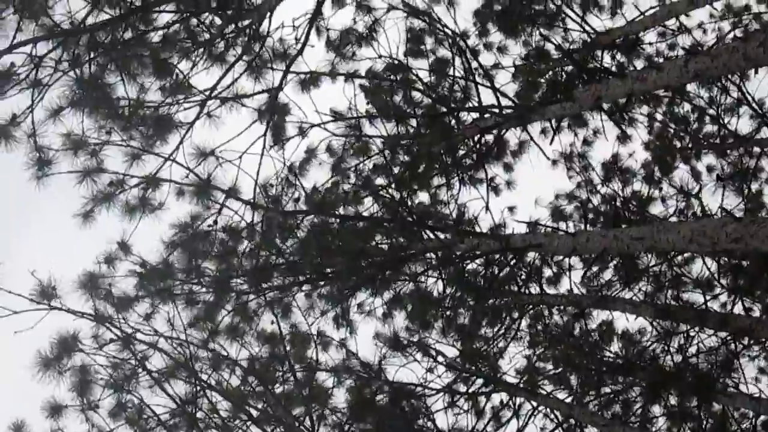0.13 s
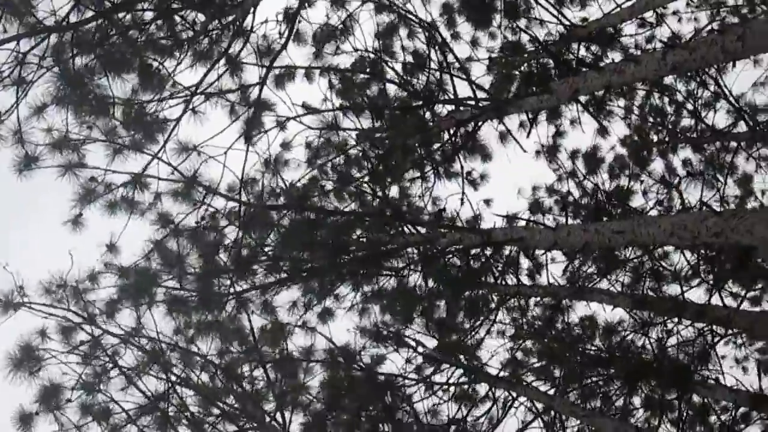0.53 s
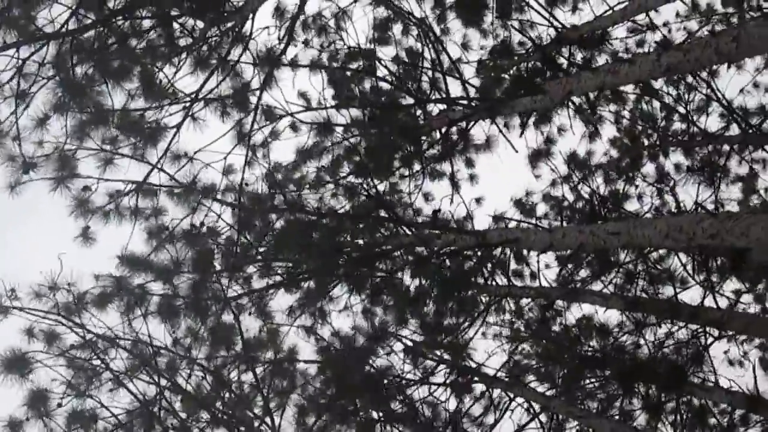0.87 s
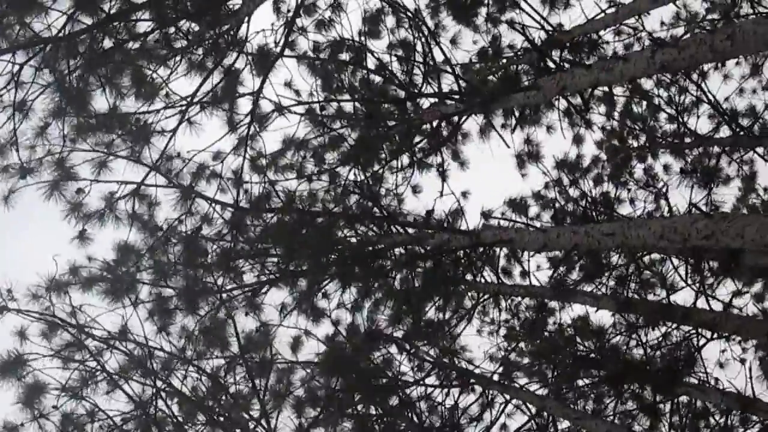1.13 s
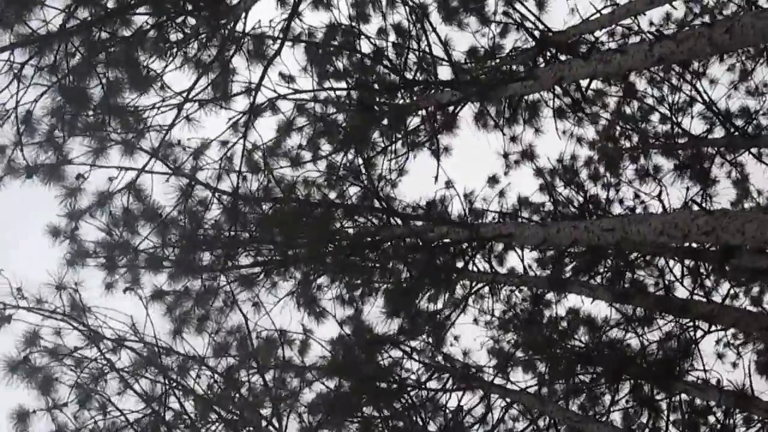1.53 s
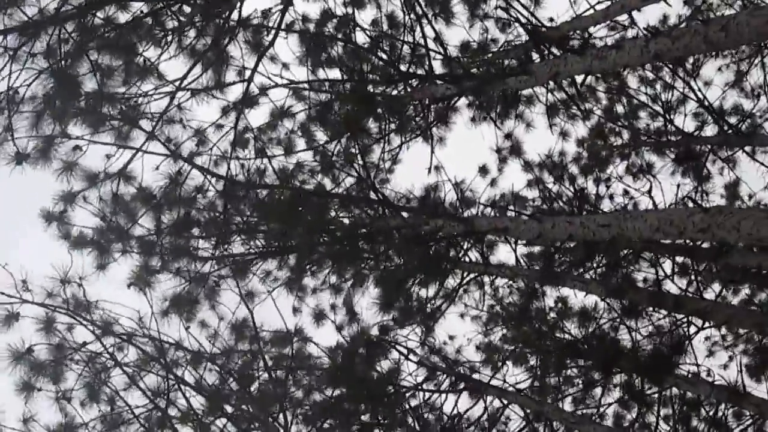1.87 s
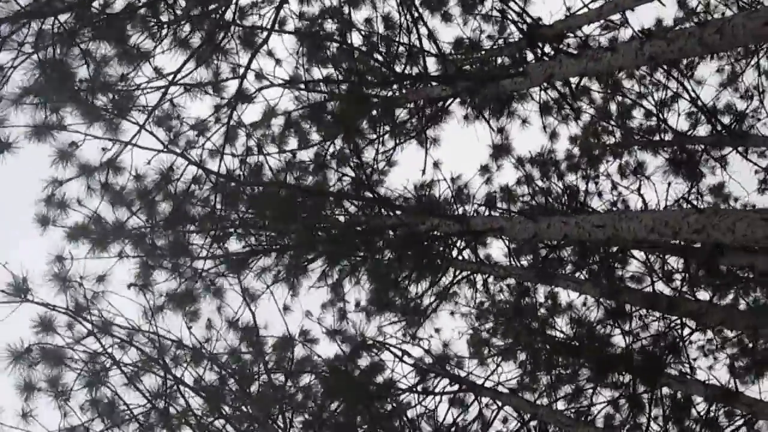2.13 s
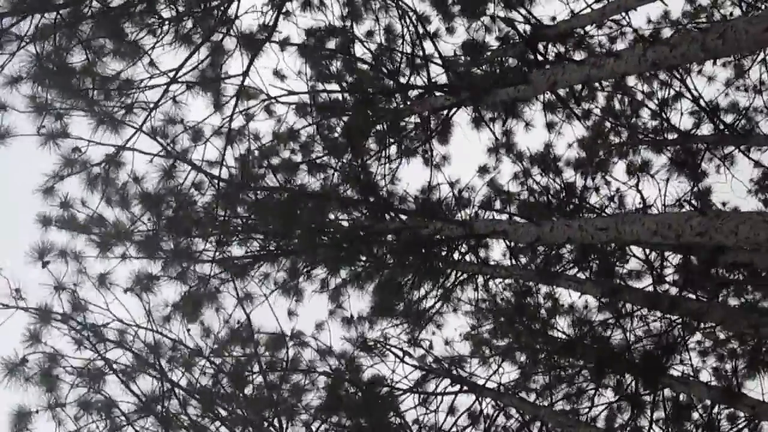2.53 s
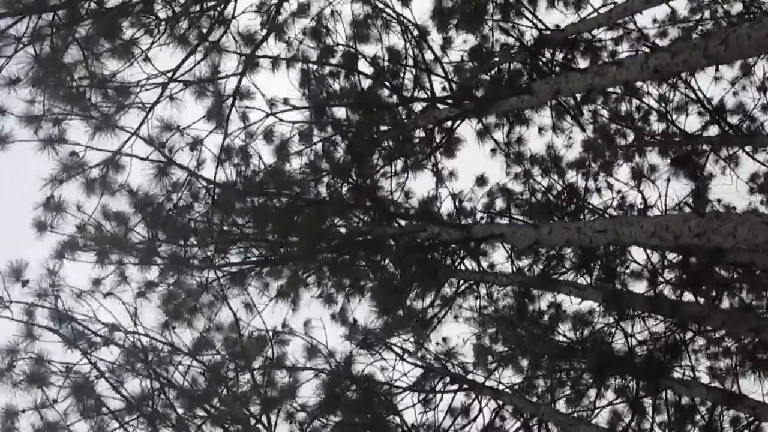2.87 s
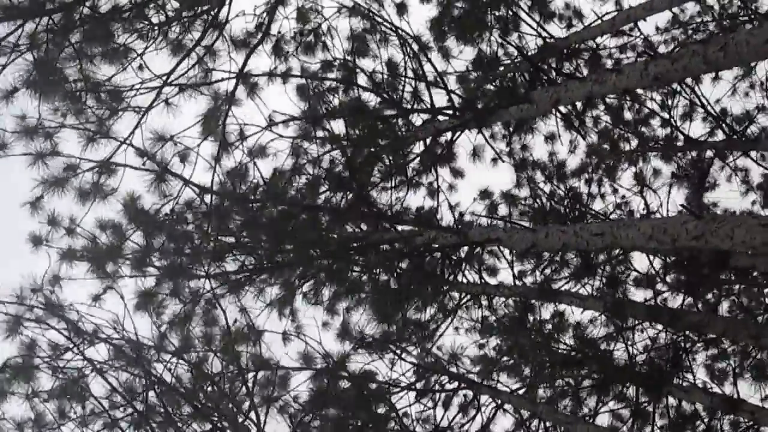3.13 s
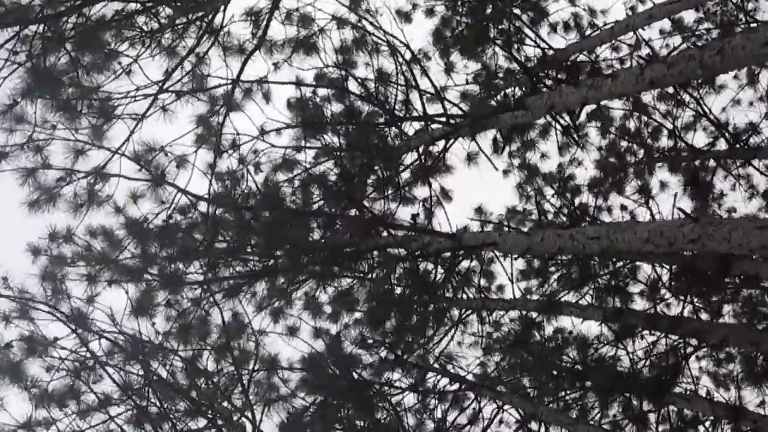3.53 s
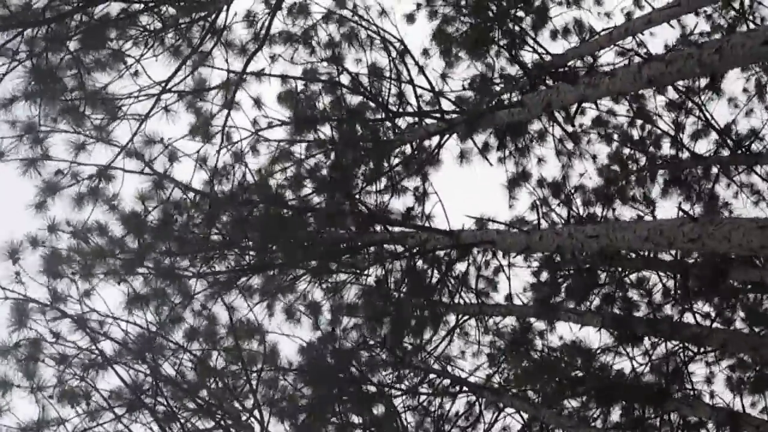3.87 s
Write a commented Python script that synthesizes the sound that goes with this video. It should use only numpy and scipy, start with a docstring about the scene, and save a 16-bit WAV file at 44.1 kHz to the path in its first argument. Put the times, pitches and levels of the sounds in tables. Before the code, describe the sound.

Outdoor wind rushes through pine crowns, broad and nearly constant, heard from below on a handheld microphone; a short scratchy rub opens it, faint low buffeting lies beneath, and crisp twig ticks cluster near the end.

```python
"""Wind in pine crowns

Wind rushes through tall pines: noise in gently flickering bands gives a broad roar around 600-1000 Hz
with needle hiss above. A low hum wavers as three wandering tones and low noise buffets the microphone.
Twigs tick as short cracks of noise. A hand-held recorder switches on, a finger rubs its case
(dense random slips through resonances), and the sound fades in over the first second."""
import sys
import numpy as np
from scipy import signal
from scipy.fft import rfft, irfft
from scipy.io import wavfile

SR = 44100
rng = np.random.default_rng(int(sys.argv[2]) if len(sys.argv) > 2 else 0)


def to_wav(s):
    """Save 16-bit WAV."""
    ch = np.atleast_2d(s).T  # columns
    pcm = np.round(np.clip(ch, -1, 1) * 32767)  # PCM
    wavfile.write(sys.argv[1], SR, pcm.astype(np.int16))


N = 176400  # 4 s
OPPOSED = np.array([[1], [-1]])  # equal and opposite in the two channels


def amp(db):
    """Decibels to linear gain."""
    return 10 ** (np.asarray(db) / 20)


def rms_one(x):
    """Scale to an RMS of 1."""
    return x / np.sqrt(np.mean(x ** 2) + 1e-20)


def in_time(rows):
    """Draw each column after the first as a curve over time."""
    s, *columns = np.transpose(rows)
    t = np.arange(N) / SR
    return [np.interp(t, s, column) for column in columns]


def drift(rate):
    """Slow chance at about rate per second, spread 1: noise through a two-pole low-pass."""
    step = 40  # samples between slow values
    pole = np.exp(-2 * step * np.pi * rate / SR)
    noise = rng.standard_normal(N // step + 2002)
    slow = signal.lfilter([1], [1, -2 * pole, pole * pole], noise)[2000:]  # drop the settling
    return np.interp(np.arange(N) / step, np.arange(len(slow)), rms_one(slow))


def coloured(points):
    """Spectrum of white noise shaped by a colour curve, drawn straight over log frequency."""
    hz, db = np.transpose(points)
    log_f = np.log(np.arange(N // 2 + 1) * SR / N + 1)
    return rfft(rng.standard_normal(N)) * amp(np.interp(log_f, np.log(hz), db))


def band(x, low_hz, high_hz):
    """Steep band-pass, scaled to a peak height of 1."""
    sos = signal.butter(3, [low_hz, high_hz], "band", fs=SR, output="sos")
    y = signal.sosfilt(sos, x)
    return y / abs(y).max()


def resonance(x, hz, width):
    """Two-pole resonance with a gain of 1 at its peak."""
    r = np.exp(-np.pi * width / SR)
    feedback = [1, -2 * r * np.cos(2 * np.pi * hz / SR), r * r]
    return signal.lfilter([(1 - r * r) / 2, 0, (r * r - 1) / 2], feedback, x + 1e-18)


# colour of the recorder's own hiss: f/Hz, level/dB (per Hz, relative)
ELECTRONICS_COLOUR = [(2500, -40), (4000, -19), (5000, -7), (8000, -1), (12000, 1), (14500, 2), (15500, -3)]
ELECTRONICS_DB = -64.5


def electronics_hiss():
    """Steady electronic noise, independent in each channel."""
    channels = [rms_one(irfft(coloured(ELECTRONICS_COLOUR), N)) for _ in range(2)]
    return amp(ELECTRONICS_DB) * np.array(channels)


# lumps of wind on the microphone port: t/s, level/dB
BUFFET_LEVELS = [(.11, -76), (.99, -58), (1.07, -60), (1.12, -40), (1.3, -50), (1.45, -58), (1.5, -46),
                 (1.75, -49), (2.07, -61), (2.61, -55), (3.22, -60), (3.42, -56), (3.98, -58)]


def buffet():
    """Wind pressure on the microphone port: noise from 18 to 70 Hz that comes in lumps."""
    sos = signal.butter(3, [18, 70], "band", fs=SR, output="sos")
    rumble = signal.sosfilt(sos, rng.standard_normal(N + SR))[SR:]  # drop the settling
    level_db, = in_time(BUFFET_LEVELS)
    return amp(level_db) * rms_one(rumble)


# wavering hum: t/s, low tone level/dB, middle tone level/dB, high tone level/dB
HUM_LEVELS = [(0.11, -73, -64.5, -72), (0.77, -58, -54, -52), (0.9, -49, -68, -59), (1.08, -54, -40.5, -54),
              (1.34, -45, -46, -55), (1.51, -43, -41, -40), (1.59, -39, -53, -59), (1.7, -37.5, -40, -47),
              (2.21, -47, -59, -53.5), (2.3, -40, -58, -66), (2.34, -39, -50, -50), (2.73, -52, -62, -54),
              (3.05, -48, -45, -47), (3.15, -57, -57, -47), (3.88, -45, -42.5, -52), (3.98, -47, -54, -43)]
# the three tones, low to high: f/Hz, spread of the pitch wander/Hz
HUM_PITCHES = [(102, 1.02), (121, 1.4), (133, 1.7)]
HUM_OCTAVE_DB = -11  # relative to the low tone


def hum():
    """Three sine tones whose pitch and level wander; the lowest has a faint octave."""
    phases = [2 * np.pi * np.cumsum(hz + wander * drift(4)) / SR for hz, wander in HUM_PITCHES]
    levels = amp(in_time(HUM_LEVELS))
    tones = np.sum(levels * np.sin(phases), axis=0)
    octave = levels[0] * amp(HUM_OCTAVE_DB) * np.sin(2 * phases[0])
    return np.sqrt(2) * (tones + octave)  # table levels are RMS


# resonances of the recorder case: f/Hz, width/Hz, level/dB (relative)
CASE_RESONANCES = [(2300, 710, 6), (3180, 670, -2), (4320, 830, -1), (8000, 1100, -20)]
RUB_START_S, RUB_PEAK_S, RUB_END_S = 0.054, 0.084, 0.096
RUB_DB, RUB_RISE_DB, RUB_SLIPS_PER_S = -35.5, 14, 5000


def rub():
    """Finger on the case: dense slips of random strength grow to a peak and excite its resonances."""
    strength = amp(4 * np.minimum(rng.exponential(1, N), 3))
    slips = (rng.random(N) < RUB_SLIPS_PER_S / SR) * rng.standard_normal(N) * strength
    body = 0
    for k, (hz, width, db) in enumerate(CASE_RESONANCES):
        ring = resonance(resonance(slips, hz, width), hz, width)  # twice for steeper sides
        body = body + amp(db) * (-1) ** k * ring  # alternate polarity
    stroke_db, = in_time([(RUB_START_S - .02, -30), (RUB_START_S, -RUB_RISE_DB), (RUB_PEAK_S, 0),
                          (RUB_END_S, -12), (RUB_END_S + .01, -90)])
    return amp(RUB_DB + stroke_db) * rms_one(body)


# twig ticks: t/s, level/dB, body f/Hz, bright part level/dB (relative to the body),
# scattered tail level/dB (relative to the crack)
TWIG_TICKS = [(.320, -43, 8000, -30, -25), (.742, -40, 7000, -12, -20), (.881, -19.5, 6000, -28, -22),
              (1.567, -36, 7500, -13, -25), (1.626, -30, 7400, -8, -30), (1.841, -21.5, 6450, -20, -20),
              (2.2985, -39, 7800, -20.5, -25), (2.476, -27, 6500, -18, -20), (2.479, -23, 6850, -20, -18),
              (3.271, -44, 9000, -4, -20), (3.303, -42, 9000, -3, -18), (3.604, -40, 7800, -13, -25),
              (3.73, -22, 3500, -29, -16), (3.735, -17, 5000, -31, -11), (3.738, -31, 8000, -16, -16),
              (3.761, -22, 4800, -27, -16), (3.782, -19.5, 6100, -13.5, -13)]
CRACK_T60_S, TAIL_T60_S, TICK_WIDE_DB = 0.007, 0.21, -22
TICK_LENGTH = 4410  # samples, 0.1 s
BODY_OCTAVES = 0.24  # each side of the body frequency
BRIGHT_HZ = (9100, 11800)
FAINT_TICKS_PER_S, FAINT_TICK_DB = 10, -22  # level relative to the roar


def ticks(roar_db):
    """Twigs crack as decaying noise with a body, a bright part and a tail; fainter ones come at random."""
    out = np.zeros((2, N + TICK_LENGTH))
    t = np.arange(TICK_LENGTH) / SR
    crack = amp(-60 * t / CRACK_T60_S)
    for s, db, hz, bright_db, tail_db in TWIG_TICKS:
        tail = amp(tail_db - 60 * t / TAIL_T60_S)
        noise = (crack + tail) * rng.standard_normal((2, len(t)))
        body = band(noise, hz / 2 ** BODY_OCTAVES, hz * 2 ** BODY_OCTAVES)
        mid, side = body + amp(bright_db) * band(noise, *BRIGHT_HZ)
        start = int(s * SR)
        out[:, start:start + len(t)] += amp(db) * (mid + amp(TICK_WIDE_DB) * side * OPPOSED)
    strength = amp(3 * np.minimum(rng.exponential(1, N), 3))
    born = (rng.random(N) < FAINT_TICKS_PER_S / SR) * strength
    faint = signal.fftconvolve(born, crack)[:N] * rng.standard_normal(N) + 1e-18
    return out[:, :N] + amp(roar_db + FAINT_TICK_DB) * band(faint, 6000, 11000)


# colour of the stereo spread: f/Hz, level/dB (per Hz, relative)
SPREAD_COLOUR = [(2800, -60), (3500, -30), (4300, -5), (5000, -2), (6200, -4), (7500, -16), (9000, -22),
                 (12000, -44)]
SPREAD_DB = -29.5  # relative to roar and needle hiss together


def stereo_spread(roar_db, hiss_db):
    """The part of the wind that differs between the two ports: treble noise of opposite sign."""
    noise = rms_one(irfft(coloured(SPREAD_COLOUR), N))
    return amp(roar_db + hiss_db + SPREAD_DB) * noise * OPPOSED


# colour of the wind in the crowns: f/Hz, level/dB (per Hz, relative)
CROWN_COLOUR = [(12, -45), (20, -25), (60, -9.5), (106, -10), (171, -9.5), (282, -9), (427, -8),
                (520, -4.5), (631, -1), (834, -1.5), (1040, -0.5), (1300, -4), (1720, -7.5), (2500, -10.5),
                (4000, -12.5), (5500, -13), (6200, -17.5), (7500, -28.5), (9000, -35), (11000, -44.5),
                (13000, -62), (15500, -75)]
NEEDLE_HISS_HZ = 3100  # middle of the one-octave passage from roar to hiss
GUST_DB, PATCH_DB, FLICKER_DB = 0.02, -0.15, 0.5  # spread: all bands, neighbouring bands, single band


def crowns(roar_db, hiss_db):
    """Wind in the crowns: noise in overlapping bands that waver slightly together, in patches and alone."""
    noise = coloured(CROWN_COLOUR)
    octave = np.log2(np.arange(N // 2 + 1) * SR / N + 1)
    out, gust, patch = 0, drift(1.5), drift(3)
    for centre in np.arange(4, 14.6, .5):  # log2 of Hz, half an octave apart
        window = np.clip(1 - 2 * abs(octave - centre), 0, 1)
        layer = irfft(noise * window, N)
        patch = np.sqrt(.5) * (patch + drift(3))  # shared in part with the band below
        hiss_share = np.clip(centre - np.log2(NEEDLE_HISS_HZ) + .5, 0, 1)
        waver_db = GUST_DB * gust + PATCH_DB * patch + FLICKER_DB * drift(20.5)
        out = out + layer * amp(hiss_share * hiss_db + waver_db)
    return amp(roar_db) * out / np.std(irfft(noise, N))


# fade-in, then gusts: t/s, roar level/dB, needle hiss level/dB (relative to the roar)
WIND_LEVELS = [(.11, -46, 0.5), (.25, -41, 0.5), (.4, -36, 0), (.55, -32, 0.5), (.7, -29, -1),
               (.87, -27, -1.5), (1.1, -26.5, -1.5), (1.45, -27, -0.5), (1.75, -26, -0.5),
               (2.1, -25.5, -1.5), (2.5, -24.5, 0), (2.75, -24, -4), (3.1, -25, 0), (3.4, -24.5, 0),
               (3.7, -25, 0.5), (3.98, -26, 0)]


def scene():
    """Lay the twigs, hum, buffeting and case rub with the wind, all on shared time."""
    roar_db, hiss_db = in_time(WIND_LEVELS)
    wind = crowns(roar_db, hiss_db) + stereo_spread(roar_db, hiss_db)
    return buffet() + hum() + rub() + ticks(roar_db) + wind


SWITCH_ON_S = 0.0363
OFFSET = 0.006  # constant, in both channels
TOP_HZ = 15400  # passband edge


def record(dry):
    """The recorder adds hiss and a small offset, is silent until switched on, and cuts the top."""
    on = np.arange(N) >= SWITCH_ON_S * SR
    heard = (dry + electronics_hiss() + OFFSET) * on
    top_cut = signal.ellip(14, .5, 80, TOP_HZ, fs=SR, output="sos")
    return signal.sosfilt(top_cut, heard)


dry = scene()
out = record(dry)
to_wav(out)
```